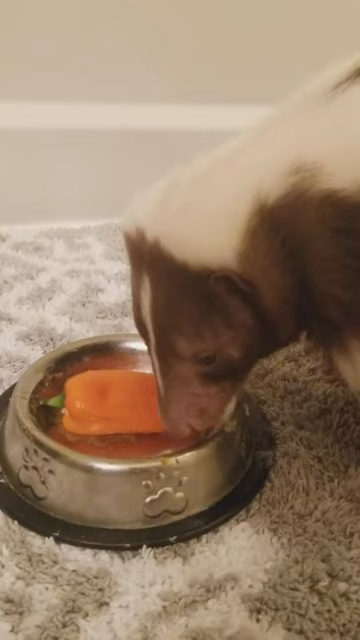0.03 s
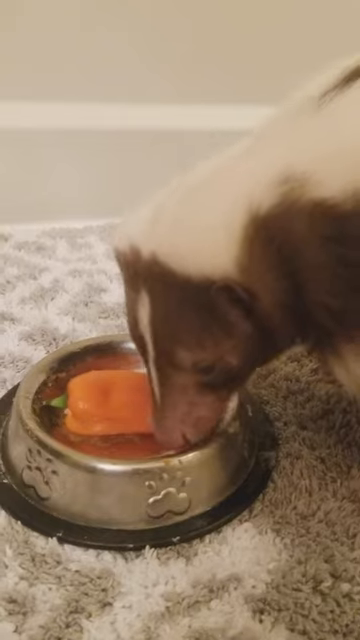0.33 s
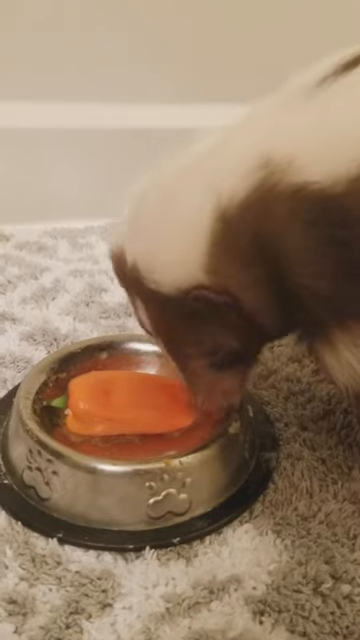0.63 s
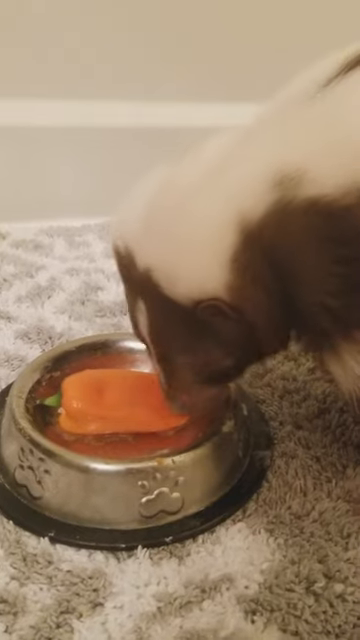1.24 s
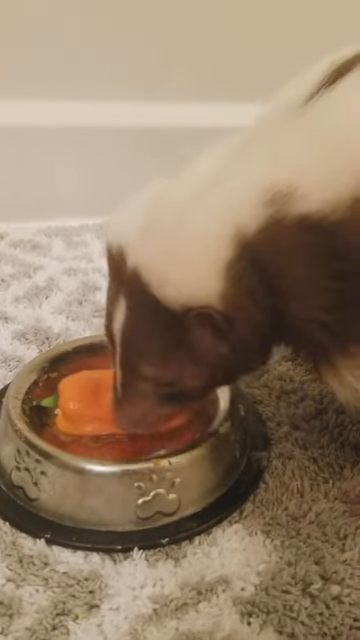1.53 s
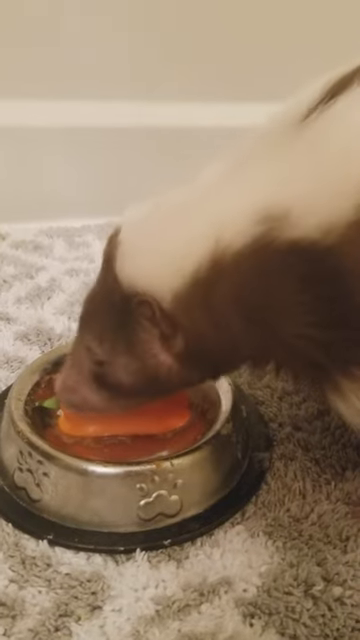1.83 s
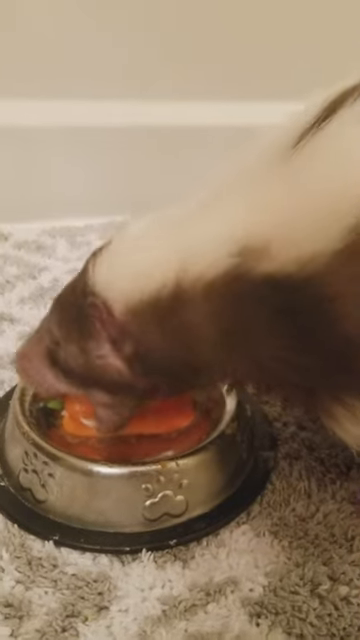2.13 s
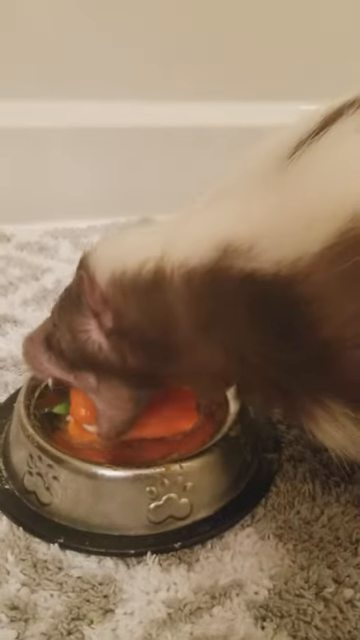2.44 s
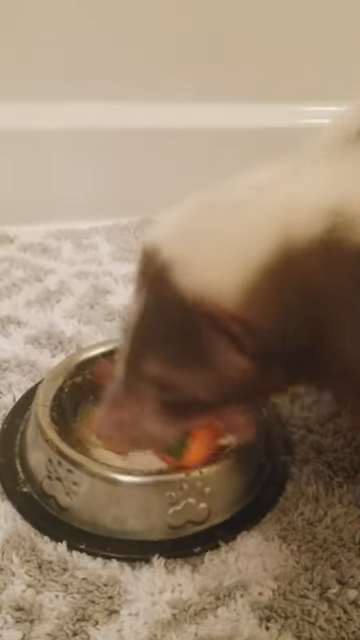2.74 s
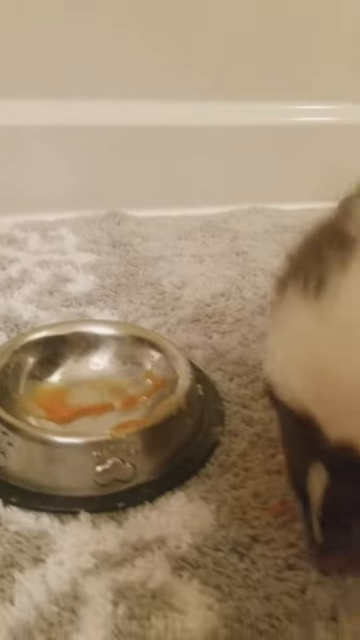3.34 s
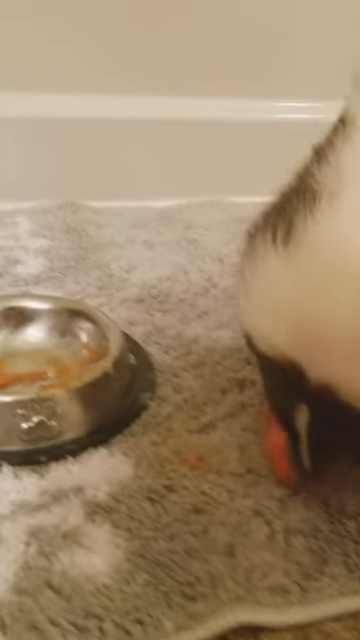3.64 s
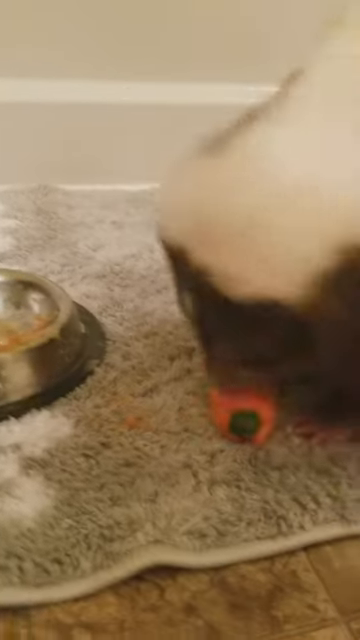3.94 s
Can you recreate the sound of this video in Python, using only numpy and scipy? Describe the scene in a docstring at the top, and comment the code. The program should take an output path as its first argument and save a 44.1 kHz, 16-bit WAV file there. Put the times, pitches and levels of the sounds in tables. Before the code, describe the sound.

A skunk eats from a steel bowl with faint wet smacks over quiet room hum.

```python
"""Tiny wet smacks and crunches in a small, quiet room: a skunk gnaws a piece of pepper in a steel bowl.
The piece rubs and tears as it is dragged up the side. It comes free, and the bowl thumps back on the rug.
Then the skunk pads off with soft knocks and a rustle.
An appliance hums and hisses faintly throughout."""
import sys
import numpy as np
from scipy import signal
from scipy.fft import rfft, irfft, next_fast_len
from scipy.io import wavfile
from scipy.ndimage import map_coordinates

SR = 44100
rng = np.random.default_rng(int(sys.argv[2]) if len(sys.argv) > 2 else 0)


def wav_out(sig):
    """Save sig, one row per channel (or a flat mono array), as 16-bit PCM at SR to the path in sys.argv[1]."""
    wavfile.write(sys.argv[1], SR, np.round(np.clip(np.atleast_2d(sig).T, -1, 1) * 32767).astype(np.int16))


N = 176400  # 4 seconds

# Wet clicks of teeth and lips. Each row: start in seconds, level in dB, pitch in Hz, width in octaves,
# pan in dB (above 0 is to the left).
SMACKS = [(0.059, -58, 13700, 0.14, 10), (.140, -51.5, 13100, 0.16, 9), (0.14, -59, 7660, 0.11, -5),
          (0.14, -67, 3100, 0.098, 7), (.153, -56, 13300, 0.13, 5), (0.385, -65, 6800, .2, 0),
          (0.4252, -63, 11300, 0.13, 6), (.4285, -65, 11300, .15, 3), (0.43, -69, 3100, .1, 2),
          (.449, -59, 14100, .12, 7), (.6425, -63, 13500, .2, 7), (.7255, -58.5, 12700, .2, 8),
          (.748, -61, 11500, .25, 4), (.7525, -61, 11800, .3, 8), (0.752, -67, 7400, .08, -3),
          (0.97, -63, 7550, .1, 5), (1.2635, -64, 13800, .12, 7), (1.3224, -55.5, 12500, 0.35, 5),
          (1.3242, -60, 12500, .3, 0), (1.3276, -61.5, 6200, 0.17, -2), (1.379, -62, 13000, .1, 6),
          (1.5835, -60, 12500, .4, 3), (1.679, -67, 12000, .15, 5), (1.8853, -67, 3950, .04, 4),
          (1.886, -67, 7500, .1, 0), (2.267, -66, 9000, .5, -1), (2.45, -58, 12400, 0.29, 12),
          (2.477, -72, 13500, 0.22, 6), (2.504, -57.5, 13700, 0.22, 17), (2.5115, -69, 14500, .15, -2),
          (2.5873, -57, 14200, 0.13, 13), (2.59, -64, 14200, 0.19, 0), (2.614, -76, 14000, 0.13, 8),
          (2.7095, -64, 14100, .15, 1), (2.747, -53, 14100, .15, 5), (2.8275, -64, 12500, .1, 6),
          (2.8483, -54, 12000, 0.071, 5), (2.8525, -59, 13500, .2, 8)]
# Soft knocks of paws and food. Each row: start in seconds, level in dB, pitch in Hz, width in octaves,
# fade time in seconds (the time to drop by 60 dB).
KNOCKS = [(2.417, -58, 1660, 0.17, .025), (2.417, -62, 1150, 0.071, .04), (2.441, -53, 1250, .25, 0.029),
          (2.504, -61, 600, .8, .012), (2.587, -62, 1700, .6, 0.011), (2.849, -56, 1100, 0.51, .008),
          (3.196, -56, 440, 0.22, 0.023), (3.198, -63, 840, 0.19, 0.016), (3.313, -60, 1350, 0.48, 0.017),
          (3.315, -54, 524, 0.19, 0.033), (3.322, -68.5, 1790, 0.042, 0.087),
          (3.4145, -56.5, 930, 0.2, 0.024), (3.427, -51.5, 900, 0.24, 0.0095), (3.418, -60, 380, 0.39, .04),
          (3.5925, -51, 810, 0.33, 0.0055), (3.622, -68, 840, .3, 0.036)]
# The bowl's ringing tones. Each row: pitch in Hz, level in dB, fade time in seconds.
BOWL_TONES = [(239.8, -52, 0.34), (331, -62, 0.37), (547, -59, 0.08), (1287, -81, .3)]
# The pepper rubs on the steel. Each row: time in seconds, level in dB.
RUB_LEVELS = [(2.405, -105), (2.417, -70), (2.455, -71.5), (2.485, -75.5), (2.55, -77.5), (2.6, -77.5),
              (2.655, -99), (2.70, -82), (2.74, -77), (2.8, -84), (2.86, -79), (2.93, -105)]
# Where the loaded bowl resonates. Each row: pitch in Hz, width in Hz, relative level in dB.
RUB_RESONANCES = [(560, 135, -1), (1170, 160, -2.5), (1390, 120, -2.5), (1665, 140, -1), (1930, 150, -2.5),
                  (2270, 320, -6)]
# Which side the rubbing comes from. Each row: frequency in Hz, pan in dB.
RUB_PAN = [(600, 0), (1300, -4.5), (1700, 1), (2200, 8.5)]
# The pepper's flesh tears. Each row: time in seconds, level in dB.
TEAR_LEVELS = [(2.39, -105), (2.42, -87), (2.505, -86), (2.535, -74), (2.58, -79), (2.62, -89),
               (2.68, -110)]
# The tone of the tearing. Each row: frequency in Hz, relative level in dB.
TEAR_COLOUR = [(1500, -19), (2600, -2), (3250, -2), (3900, -9), (4750, -3), (5700, -13), (7300, -4),
               (9500, -18), (16000, -5)]
# The bowl sings faintly as the piece slides over the rim. Each row: time in seconds, level in dB.
SING_LEVELS = [(2.69, -100), (2.735, -78), (2.79, -80), (2.82, -90), (2.85, -81), (2.91, -86), (2.98, -100)]
# Crackle of wet flesh and rug pile. Each row: start in seconds, length in seconds, level in dB,
# pitch in Hz, width in octaves, pan in dB.
CRACKLES = [(0.1, .035, -83, 7600, 0.05, -2), (0.388, 0.056, -85, 6840, 0.19, 0),
            (.69, .08, -89, 13000, .25, -3), (1.325, 0.052, -75.5, 12000, 0.27, 3),
            (1.558, .09, -88, 13500, 0.16, 6), (1.69, .08, -84, 13000, 0.24, 7),
            (2.423, .105, -82, 13500, .2, 10), (2.705, 0.092, -78, 14400, 0.19, 12),
            (2.767, 0.14, -80, 13200, 0.15, 13), (3.883, 0.13, -81, 12800, .25, 8),
            (3.895, 0.05, -78.5, 6850, 0.2, -2)]
# Paws and fur brush the rug as the skunk turns away. Each row: time in seconds, level in dB.
SHUFFLE_LEVELS = [(2.8, -100), (2.87, -74), (2.96, -77), (3.1, -93), (3.19, -79), (3.45, -75), (3.55, -84),
                  (3.8, -87), (3.91, -72), (4.0, -83)]
# The tone of that brushing. Each row: frequency in Hz, relative level in dB.
SHUFFLE_COLOUR = [(100, -25), (200, -3), (330, -3), (520, -2), (700, -11.5), (1500, -17.5), (3000, -27),
                  (9000, -42)]
# Motor and mains hum. Each row: pitch in Hz, average level in dB.
HUM_TONES = [(59.1, -46), (111.3, -65), (118.2, -66), (177.4, -65.5), (236.7, -76.5), (240, -74.5)]
# The low rumble and the hiss of the room's air. Each row: frequency in Hz, relative level in dB.
RUMBLE_COLOUR = [(15, -22.5), (25, -8), (35, -5), (48, -8), (62, -0.5), (80, 2), (100, -2.5), (112, -2.5),
                 (128, -13), (140, -8), (170, -6.5), (195, -14), (220, -12), (270, -19.5), (320, -19),
                 (430, -29.5), (530, -30), (650, -39.5), (1000, -45.5), (3000, -82)]
HISS_COLOUR = [(200, 1), (700, 9.5), (1200, 6.5), (1650, 5.5), (1950, 10.5), (2400, 5), (3000, 1),
               (5000, 0), (7200, 0.5), (10500, 1), (12500, 2), (14000, 0.8), (15500, 4)]
# How alike the air sounds in both ears. Each row: frequency in Hz, likeness from 0 (unrelated) to 1.
EAR_LIKENESS = [(60, 0.71), (130, 0.84), (250, 0.76), (500, 0.32), (1000, 0), (2000, 0.3), (4000, 0)]
# The room's short echo. Each row: frequency in Hz, fade time in seconds.
ROOM_FADES = [(200, 0.38), (1000, 0.22), (4000, 0.14), (13000, 0.057)]

TIME = np.arange(N) / SR  # seconds
LEAD_S = 0.01  # spare time ahead of each click or knock


def smacks():
    """Each parting of teeth or lips makes a tiny, high click."""
    out = np.zeros((2, N))
    for start, db, hz, octaves, pan_db in SMACKS:
        click = burst(hz, octaves, fade_s=0.0057, spill_db=-27, likeness=0.32)
        add(out, start - LEAD_S, amp(db) * pan(pan_db) * in_room(click, echo_db=3))
    return out


def knocks():
    """Paws and food bump the bowl and floor with dull knocks that die quickly."""
    out = np.zeros((2, N))
    for start, db, hz, octaves, fade_s in KNOCKS:
        knock = burst(hz, octaves, fade_s, spill_db=-30, likeness=1.0)
        add(out, start - LEAD_S, amp(db) * in_room(knock, echo_db=-4))
    return out * pan(-3)


def bowl_thump():
    """The bowl drops back on its rubber foot: one low push, then a short ring."""
    land_s, push_hz, width_s = 2.849, 238, 0.0017
    t = TIME - land_s
    push = amp(-41.5) * np.exp(-.5 * (t / width_s) ** 2) * np.cos(2 * np.pi * push_hz * t)
    age = np.maximum(t, 0)
    ring = sum(amp(db - 60 * age / fade_s) * np.sin(2 * np.pi * hz * age) for hz, db, fade_s in BOWL_TONES)
    return in_room(push + ring, echo_db=-19)


def pepper_drag():
    """The pepper slips over the steel in tiny jerks and tears; one tone of the bowl sings along."""
    def rub_colour(f):
        bowl = sum((-1) ** k * amp(db) * 1j * f * width / (hz * hz - f * f + 1j * f * width)
                   for k, (hz, width, db) in enumerate(RUB_RESONANCES))
        return bowl * bell(f, 1400, octaves=1.6) * pan(along(RUB_PAN, f))

    rub = unit(filtered(slips(per_s=900, spread_db=4), rub_colour))
    tear = pan(2.2) * coloured(slips(per_s=1600, spread_db=4), TEAR_COLOUR)
    sing = pan(0) * band(rng.standard_normal(N), hz=1290, octaves=.033)
    scrape = rub * level(RUB_LEVELS) + tear * level(TEAR_LEVELS)
    return in_room(scrape, echo_db=-0.5) + sing * level(SING_LEVELS)


def crackles():
    """Wet flesh and rug pile give off clouds of very fine ticks that swell and fade."""
    rise_s, fall_s = 0.01, 0.052
    out = np.zeros((2, N))
    for start, length, db, hz, octaves, pan_db in CRACKLES:
        rise = np.clip((TIME - start) / rise_s, 0, 1)
        fall = np.clip((start + length - TIME) / fall_s, 0, 1)
        ticks = band(slips(per_s=1800, spread_db=1.5), hz, octaves)
        out += amp(db) * pan(pan_db) * rise * fall * ticks
    return in_room(out, echo_db=2)


def rug_shuffle():
    """The rug's pile rubs under the moving animal with a soft, dull rustle."""
    return level(SHUFFLE_LEVELS) * coloured(slips(per_s=1800, spread_db=5), SHUFFLE_COLOUR)


def appliance():
    """A motor hums a little unsteadily, with a narrow hiss on the left."""
    hum = np.zeros(N)
    for hz, db in HUM_TONES:
        waver = hz / HUM_TONES[0][0]  # higher tones waver more
        phase = 2 * np.pi * (hz * TIME + rng.random()) + 0.089 * waver * wobble(per_s=5)
        hum += np.sqrt(2) * amp(db + 0.36 * waver * wobble(per_s=6.6)) * np.sin(phase)
    even_noise = stereo_noise([(100, 0.0077), (10000, 0)])
    hiss = band(even_noise, hz=2087, octaves=.1)
    return hum + amp(-86 - 1.7 * wobble(per_s=5)) * pan(12) * hiss


def room_air():
    """The air of the room is a steady low rumble and a faint hiss."""
    return amp(-56) * stereo_noise(RUMBLE_COLOUR) + amp(-74) * stereo_noise(HISS_COLOUR)


def in_room(x, echo_db):
    """The direct sound plus a fresh echo of dying noise for each ear."""
    hz, t, noise = signal.stft(rng.standard_normal((2, SR // 3)), SR, nperseg=256)
    fade = amp(-60 * t / along(ROOM_FADES, hz)[:, None])
    tail = signal.istft(noise * fade, SR, nperseg=256)[1]
    tail = tail / np.linalg.norm(tail[0])
    echo = signal.fftconvolve(np.atleast_2d(x), tail, axes=1)[:, :x.shape[-1]]
    return x + amp(echo_db) * echo


def burst(hz, octaves, fade_s, spill_db, likeness):
    """A sharp tap and a dying puff of noise around one pitch, spilling weakly into a wider band."""
    t = np.arange(SR // 3) / SR - LEAD_S
    fade = (t >= 0) * amp(-60 * np.abs(t) / fade_s)
    noise = rng.standard_normal((3, len(t)))  # shared, left, right
    force = fade * (np.sqrt(likeness) * noise[0] + np.sqrt(1 - likeness) * noise[1:])
    force[:, np.argmax(fade)] += np.linalg.norm(fade)  # the tap
    puff = filtered(force, lambda f: bell(f, hz, octaves) + amp(spill_db) * bell(f, hz, 1.7))
    return .5 * puff * np.linalg.norm(fade) / np.linalg.norm(puff, axis=1, keepdims=True)


def slips(per_s, spread_db):
    """Tiny stereo ticks of uneven size at random moments."""
    hits = rng.random(N) < per_s / SR
    sizes = amp(spread_db * np.clip(rng.standard_normal(N), -2, 2))
    return unit(hits * sizes * rng.standard_normal((2, N)))


def stereo_noise(colour):
    """Steady noise, alike for both ears in the bass and unrelated in the treble."""
    def response(f):
        angle = np.arccos(np.clip(along(EAR_LIKENESS, f), -1, 1)) / 2
        return amp(along(colour, f)) * [np.cos(angle), np.sin(angle)]

    mid, side = filtered(rng.standard_normal((2, N)), response)
    return unit(np.array([mid + side, mid - side]))


def amp(db):
    """Turn decibels into a gain."""
    return 10 ** (np.asarray(db) / 20)


def unit(x):
    """Scale a sound to an average strength (rms) of 1."""
    return x / np.sqrt(np.mean(x ** 2) + 1e-30)


def along(rows, hz):
    """Read between (Hz, value) rows on a log-frequency scale."""
    f, values = np.transpose(rows)
    return np.interp(np.log(hz + 1), np.log(f + 1), values)


def level(rows):
    """A gain for each sample from (seconds, dB) rows, silent outside them."""
    seconds, db = np.transpose(rows)
    return amp(np.interp(TIME, seconds, db, left=-200, right=-200))


def pan(db):
    """Two gains that make the left ear db louder than the right."""
    return amp(np.array([[.5], [-.5]]) * db)


def wobble(per_s):
    """A smooth curve through per_s random values a second."""
    return map_coordinates(rng.standard_normal(2048), [TIME * per_s], mode="wrap")


def filtered(x, response):
    """Scale each frequency f in a sound by response(f)."""
    n = x.shape[-1]
    padded = next_fast_len(n + n // 8)
    return irfft(rfft(x, padded) * response(np.fft.rfftfreq(padded, 1 / SR)), padded)[..., :n]


def bell(f, hz, octaves):
    """A smooth hump around one pitch."""
    return np.exp(-.5 * (np.log2((f + 1) / hz) / octaves) ** 2)


def band(x, hz, octaves):
    """Keep the part of a sound near one pitch, at strength 1."""
    return unit(filtered(x, lambda f: bell(f, hz, octaves)))


def coloured(x, colour):
    """Shape a sound's tone with (Hz, dB) rows, at strength 1."""
    return unit(filtered(x, lambda f: amp(along(colour, f))))


def add(track, start_s, sound):
    """Mix a sound into a track at a given time."""
    part = track[..., round(start_s * SR):][..., :sound.shape[-1]]
    part += sound[..., :part.shape[-1]]


def scene():
    """The skunk and its bowl over the room's hum."""
    feeding = smacks() + knocks() + bowl_thump() + pepper_drag() + crackles()
    return feeding + appliance() + room_air() + rug_shuffle()


def record(dry):
    """The sound starts after a moment of silence, and the very highest treble is cut off."""
    start_s, fade_in_s, top_hz = .0455, .002, 15750
    fade_in = np.clip((TIME - start_s) / fade_in_s, 0, 1)
    return filtered(dry * fade_in, lambda f: f < top_hz)


dry = scene()
out = record(dry)
wav_out(out)
```